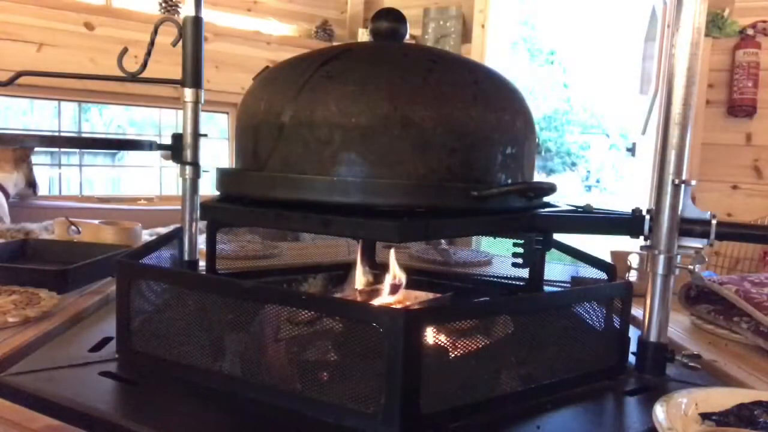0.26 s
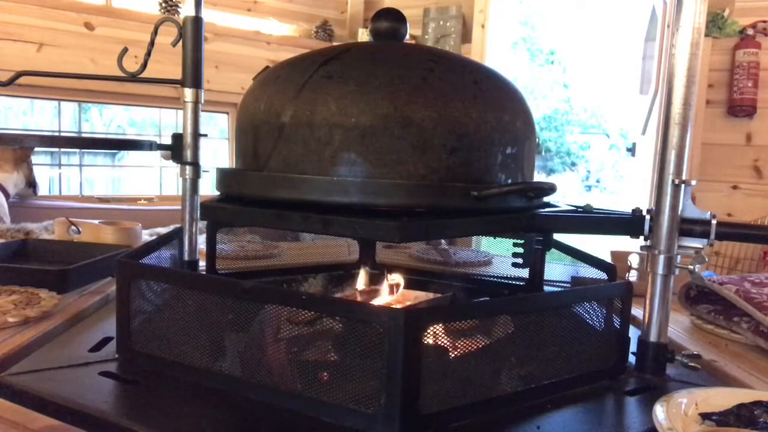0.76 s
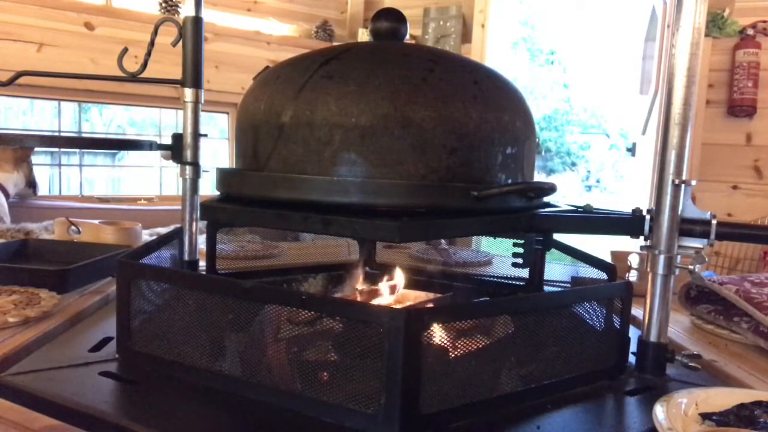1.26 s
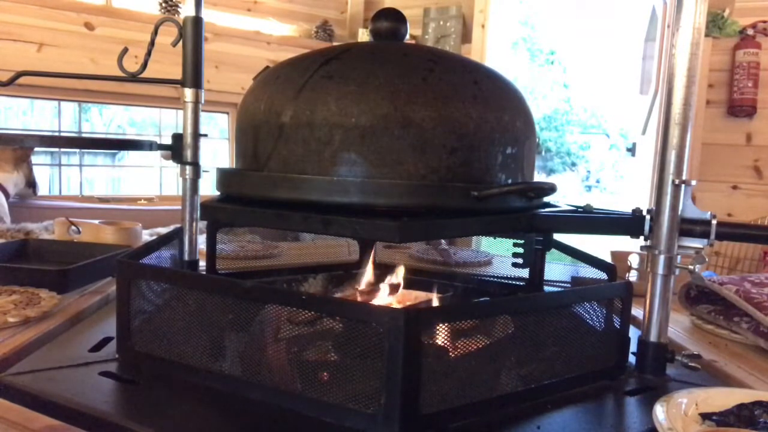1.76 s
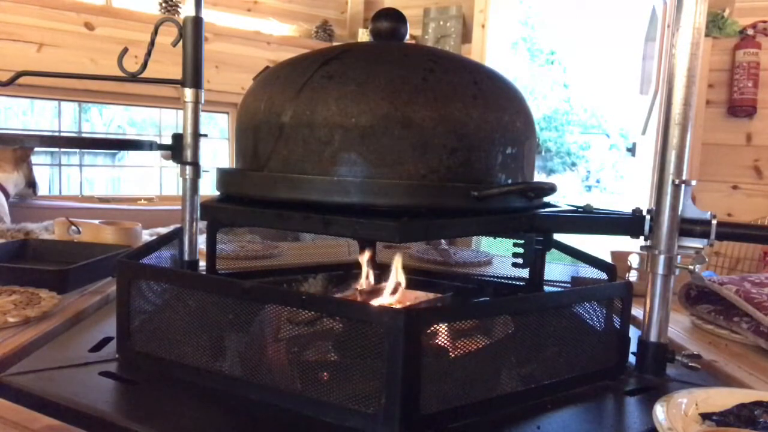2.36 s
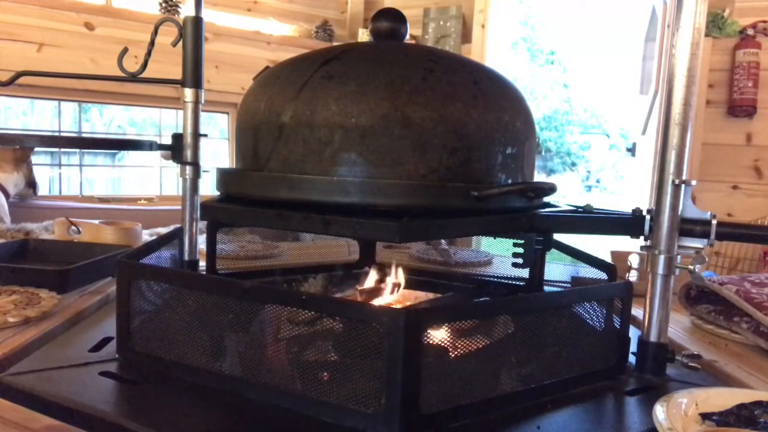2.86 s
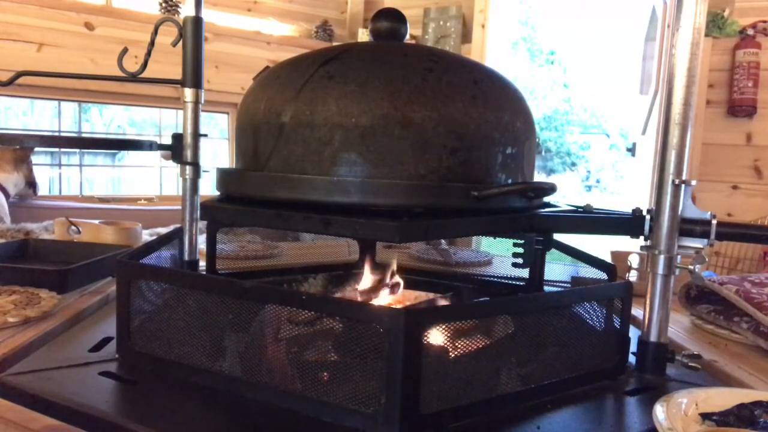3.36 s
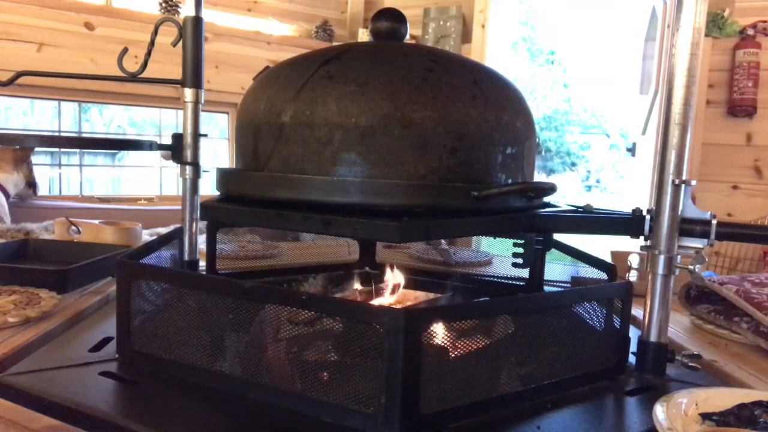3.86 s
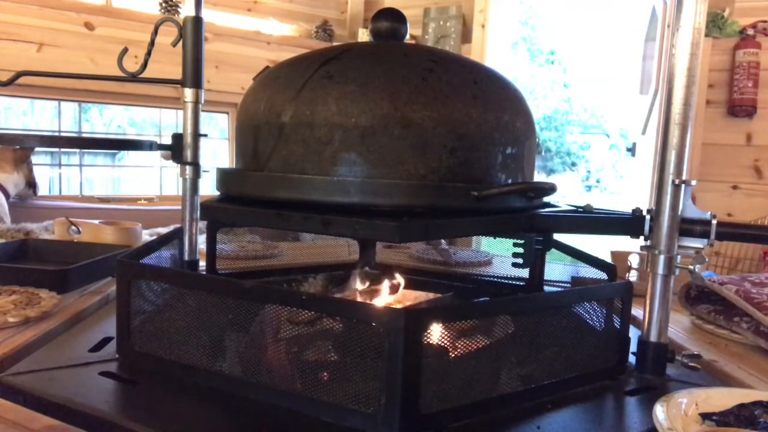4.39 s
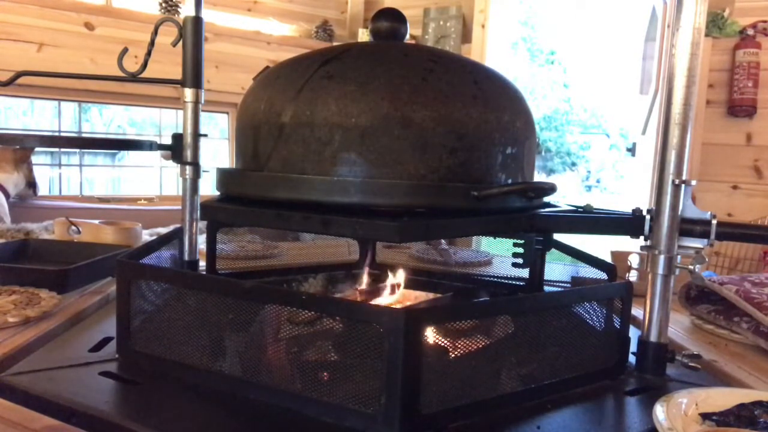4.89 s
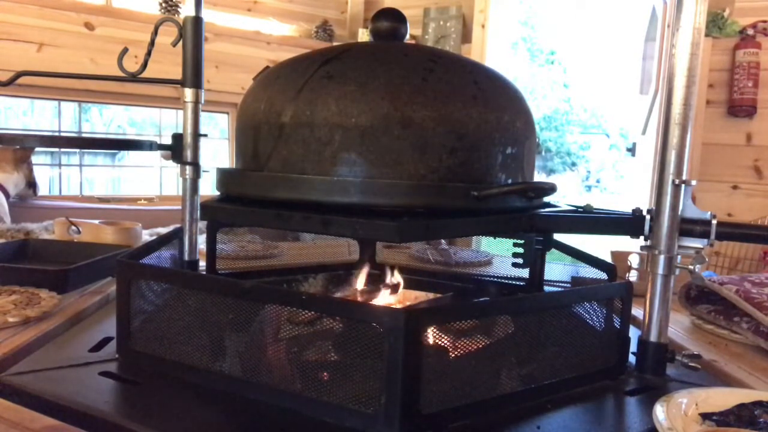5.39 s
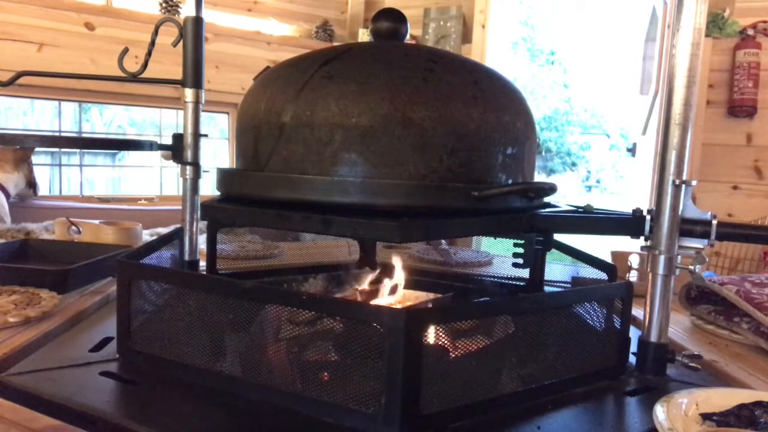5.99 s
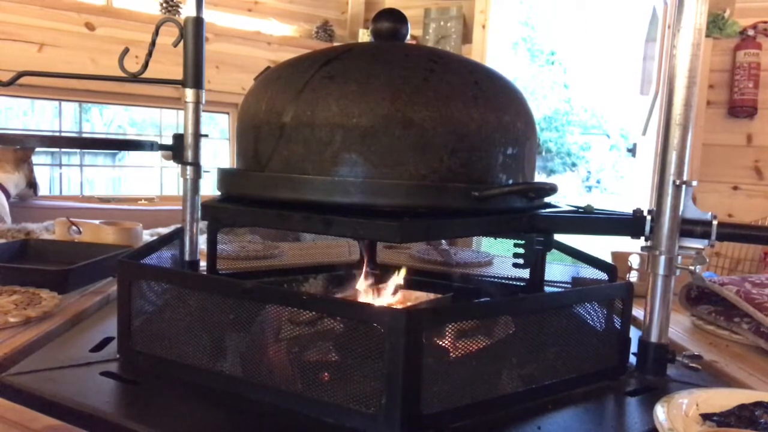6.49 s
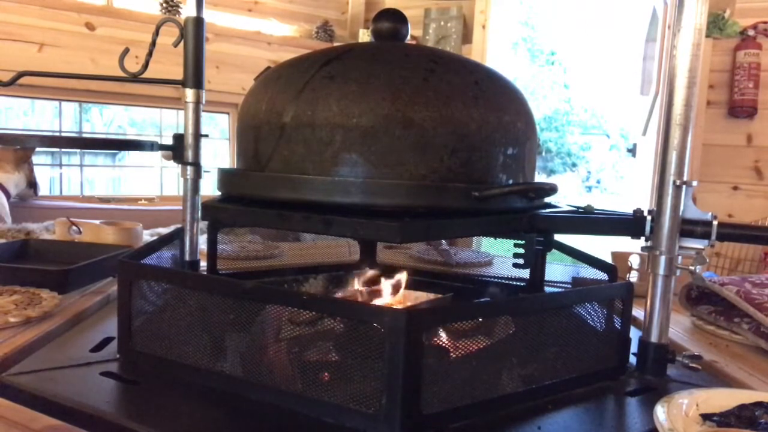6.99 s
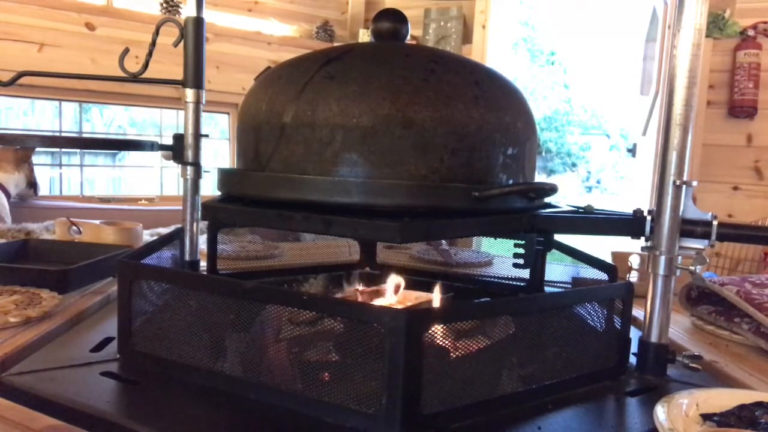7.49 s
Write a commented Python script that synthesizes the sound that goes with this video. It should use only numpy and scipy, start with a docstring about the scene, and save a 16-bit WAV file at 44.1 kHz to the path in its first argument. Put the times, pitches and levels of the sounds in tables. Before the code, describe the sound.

Meat sizzles and spits steadily under a domed iron lid over a softly fluttering wood fire, with pops and one dull wooden knock.

```python
"""A broad, even rush fills the first half second and stops with a soft click; behind it a wood fire flutters in a hut.
Meat sizzles under a domed iron lid: bubbling fat and fizz are filtered bursts and noise, spurts and pops are
decaying crowds of bubbles and pings, and escaping steam hisses and whistles as narrow sliding noise.
Embers snap as short noise, the floor thumps in a few low modes, and wood scuffs softly and knocks once.
A small bird chirps faintly outside in two rising voices; the wooden walls answer as a short noise tail."""
import sys
import numpy as np
from scipy import signal
from scipy.fft import rfft, irfft, next_fast_len
from scipy.io import wavfile
from scipy.ndimage import map_coordinates

SR = 44100
rng = np.random.default_rng(int(sys.argv[2]) if len(sys.argv) > 2 else 0)


def persist_wave(psi):
    """Save psi, clipped to +-1, as 16-bit WAV."""
    counts = np.round(np.clip(psi, -1, 1) * 32767).astype(np.int16)
    wavfile.write(sys.argv[1], SR, np.atleast_2d(counts).T)


N = 341583
TIME = np.arange(N) / SR  # seconds
RUSH_STOP_S = 0.5091  # when the opening rush stops

# How hard the fat works on the plate. Each row: time in seconds, boiling level in dB before its trim, fizz level in dB.
HEAT_CURVE = [(0.5, -61.5, -62.5), (0.56, -55, -67.5), (1.12, -54, -69), (1.57, -53.5, -60),
              (1.95, -52, -62.5), (2.29, -51.5, -65), (3.17, -49.5, -60), (3.6, -52.5, -64.5),
              (4.03, -51.5, -62.5), (4.38, -50.5, -65), (5.07, -51, -62), (5.55, -52.5, -64),
              (5.85, -54, -65.5), (6.5, -55, -63.5), (7.29, -54.5, -64), (7.75, -51.5, -62.5)]
# Colour of the frying heard through the gap of the lid. Each row: frequency in Hz, level in dB per Hz.
FAT_SPECTRUM = [(590, -35.5), (1000, -18), (1140, -24), (1310, -17), (1630, -10.5), (1790, -13), (2280, -2),
                (2520, -2.5), (3050, -1), (3650, -6), (4640, -13), (4830, -18), (6660, -20), (11000, -37.5),
                (14300, -104), (22000, -120)]
# Resonances of the air under the lid. Each row: frequency in Hz, width in Hz at half gain, relative level in dB.
LID_MODES = [(1325, 50, -9), (1490, 80, -12), (1640, 60, -5), (2300, 170, -1), (2780, 130, -3),
             (2960, 90, -2), (3160, 140, 0), (3490, 90, -6), (3830, 90, -12), (4220, 120, -9),
             (4570, 150, -4), (5340, 110, -11), (5730, 120, -13), (7940, 150, -18)]


def amp(db):
    """Decibels to gain."""
    return 10 ** (np.asarray(db) / 20)


def unit(x):
    """Scale to rms 1."""
    return x / np.sqrt(np.mean(x ** 2) + 1e-20)


def along(points, hz):
    """Read (Hz, value) points on a logarithmic frequency axis."""
    f, v = np.transpose(points)
    return np.interp(np.log(hz + 1), np.log(f + 1), v)


def curves(rows):
    """One value per sample for each column after the time."""
    s, *columns = np.transpose(rows)
    return [np.interp(TIME, s, column) for column in columns]


def wobble(rate):
    """A smooth random curve with rate knots a second."""
    knots = rng.standard_normal(int(N * rate / SR) + 4)
    return map_coordinates(knots, [TIME * rate])


def fade(t, t60):
    """Exponential decay by 60 dB in t60 seconds."""
    return np.exp(-np.log(1000) * t / max(t60, 1e-4))


def add(track, s, sound):
    """Mix a sound into the track at s seconds."""
    start = max(round(s * SR), 0)
    part = track[start:][:len(sound)]
    part += sound[:len(part)]


def coloured(x, gain):
    """Causal minimum-phase filter whose gain is a function of frequency."""
    m = 2 * next_fast_len(N // 2 + 8192)
    log_gain = np.log(np.maximum(gain(np.fft.rfftfreq(m, 1 / SR)), 1e-6))
    cepstrum = irfft(log_gain)
    # fold the second half onto the first: nothing sounds ahead of its cause
    cepstrum[1:m // 2] *= 2
    cepstrum[m // 2 + 1:] = 0
    return irfft(rfft(x, m) * np.exp(rfft(cepstrum)))[:N]


def noise(spectrum):
    """Noise of rms 1 with a given spectrum."""
    return unit(coloured(rng.standard_normal(N), lambda hz: amp(along(spectrum, hz))))


def narrow(hz, width_hz):
    """A fuzzy line of rms 1: slow noise carried on the pitch hz, one value per sample."""
    phase = 2 * np.pi * np.cumsum(hz) / SR
    knots = np.arange(len(hz)) * width_hz / SR
    a, b = (map_coordinates(rng.standard_normal(4096), [knots], mode="mirror") for _ in range(2))
    return unit(a * np.cos(phase) + b * np.sin(phase))


def hut(x, wet_db):
    """Direct sound plus the decaying answer of the wooden walls, scaled for unchanged power."""
    # Decay of the hut. Each row: frequency in Hz, time to fall 60 dB in seconds.
    wall_decay = [(200, 0.12), (2500, 0.65), (12000, 0.36)]
    hz, t, z = signal.stft(rng.standard_normal(SR // 2), SR, nperseg=256)
    decay = np.exp(-np.log(1000) * t / along(wall_decay, hz)[:, None])
    tail = signal.istft(z * decay, SR, nperseg=256)[1]
    late = np.pad(x, (SR // 300, 0))  # the walls answer after 1/300 s
    echo = signal.fftconvolve(late, tail / np.linalg.norm(tail))[:N]
    return (x + amp(wet_db) * echo) / np.hypot(1, amp(wet_db))


def close_echoes(x, count=14, span_s=0.009, bounce=0.087):
    """A few random, closely spaced reflections cut fine fixed ridges into the spectrum."""
    when, strength = rng.random(count), rng.standard_normal(count)
    echoes = np.bincount((when * span_s * SR).astype(int) + 1, bounce * strength)
    echoes[0] = 1  # direct sound
    return signal.fftconvolve(x, echoes / np.linalg.norm(echoes))[:N]


def patchy(x, depth_db, order=(5, 9)):
    """Many spots boil on their own, so each region of pitch swells and sinks by itself."""
    z = signal.stft(x, nperseg=256)[2]
    smoothing = np.outer(*map(np.hanning, order))  # over frequency, over time
    field = signal.fftconvolve(rng.standard_normal(z.shape), smoothing, "same")
    return signal.istft(z * amp(depth_db * unit(field)), nperseg=256)[1][:N]


def bubbles(rate, spread_db, cycles, low_hz, high_hz, count=30000, size=128):
    """Tiny bursting bubbles at random times: damped pings of uneven size and pitch."""
    when, pitch, rank, alive = rng.random((count, 4)).T[:, :, None]
    hz = low_hz * (high_hz / low_hz) ** pitch
    t = np.arange(size) / SR
    happens = alive < rate * N / SR / count
    strength = amp(-spread_db * np.log(rank + 0.01)) * happens * np.sqrt(hz / low_hz)
    pings = strength * np.sin(2 * np.pi * hz * t) * np.exp(-hz * t / cycles)
    places = (when * N).astype(int) + np.arange(size)
    return unit(np.bincount(places.ravel(), pings.ravel())[:N])


def small_events(rate, level_db, spread_db=2, count=80, calm_db=-52):
    """Random events, more frequent and louder with the heat: rows (s, dB, a chance value 0-1)."""
    # rate (per second) and level_db hold where the boiling curve stands at calm_db, an ordinary simmer
    when, luck, size, chance = rng.random((count, 4)).T
    s = when * N / SR
    times, heat_db, _ = np.transpose(HEAT_CURVE)
    over_db = np.interp(s, times, heat_db) - calm_db
    happens = luck < rate * amp(over_db) * N / SR / count
    event_db = level_db + over_db + spread_db * (2 * size - 1)
    return np.column_stack([s, event_db, chance])[happens]


def puffs(rows, width, glide):
    """Short swells of narrow noise, each sliding a little in pitch."""
    out = np.zeros(N)
    for s, db, hz, length in rows:
        u = np.linspace(-1, 1, int(length * SR))
        pitch = hz * (1 + glide * rng.uniform(-0.948, 1) * u)
        swell = np.cos(np.pi / 2 * u)
        add(out, s - length / 2, amp(db) * swell * narrow(pitch, width * hz))
    return out


def under_lid(x, ring_db):
    """Frying heard through the gap of the lid, whose cavity lifts a few narrow bands."""
    def gain(hz):
        ring = sum(amp(db) / (1 + (2 * (hz - fc) / width) ** 2) for fc, width, db in LID_MODES)
        return amp(along(FAT_SPECTRUM, hz)) + amp(ring_db) * ring
    return unit(coloured(x, gain))


def rush(click_db=-32.0, click_hz=2400, fall_s=0.00028, click_t60=0.022):
    """A broad, even rush stops dead with a soft click whose pitch drops into the bass."""
    # Colour of the rush. Each row: frequency in Hz, level in dB per Hz.
    rush_spectrum = [(60, -13), (150, -6), (280, 0.5), (400, -1), (700, 2), (1300, 4), (2000, 3.5),
                     (2800, 7), (4000, -2.5), (9000, -21), (15000, -62)]
    out = amp(-51.5) * noise(rush_spectrum) * (TIME < RUSH_STOP_S)
    t = TIME[:SR // 20]
    phase = 2 * np.pi * np.cumsum(click_hz / (1 + t / fall_s)) / SR
    add(out, RUSH_STOP_S, amp(click_db) * np.sin(phase) * fade(t, click_t60))
    return out


def air(lower_hz=602, upper_hz=702, air_db=-66.5, hush_depth_db=-3, recovery_s=0.74):
    """Still hut air as soft noise with two faint wavering tones, all hushed just after the rush."""
    # Two hollow tones take turns. Each row: time in seconds, lower tone in dB, upper tone in dB, before a 1 dB cut.
    hollow_levels = [(.7, -80, -86), (.9, -71, -85), (1.42, -68, -73), (1.55, -77, -71.5), (3.5, -92, -74),
                     (5.6, -86, -71.5), (6.6, -77, -77), (6.8, -69, -82), (7.75, -67, -71)]
    # Colour of the still air. Each row: frequency in Hz, level in dB per Hz.
    air_spectrum = [(30, -5.5), (70, -1), (150, -2), (280, 1.5), (380, 0), (520, -0.5), (640, -1),
                    (800, -1), (1100, -3), (1600, -9.5), (4000, -40)]
    lower_db, upper_db = curves(hollow_levels)
    since = (TIME - RUSH_STOP_S) / recovery_s
    hush_db = hush_depth_db * (since > 0) * np.clip(1 - since ** 2, 0, 1)

    def wavering(hz, db):
        return amp(db + 2.5 * wobble(20)) * narrow(hz + 14 * wobble(8), width_hz=90)
    tones = wavering(lower_hz, lower_db) + wavering(upper_hz, upper_db)
    still = amp(air_db + 0.6 * wobble(3.805)) * noise(air_spectrum)
    return amp(hush_db) * (still + amp(-1) * tones)


def fire(spray_over_crack=14):
    """Flames flutter as low noise under the plate; embers snap with a sharp crack, then a short spray."""
    # Flutter of the flames. Each row: time in seconds, level in dB.
    flame_levels = [(0.0, -71), (1.1, -67), (1.8, -72), (3.3, -73.5), (4.85, -74), (5.6, -66), (7.0, -64),
                    (7.75, -67.5)]
    # Ember snaps. Each row: start in seconds, level in dB before a 3 dB lift, time for the crack to fall 60 dB in seconds.
    ember_snaps = [(1.6535, -60, .004), (1.767, -55, .008), (3.053, -56, .004), (3.2099, -45, 0.012),
                   (6.1288, -41.5, 0.0019), (7.72, -46, .003)]
    # Colours of flames and embers. Each row: frequency in Hz, level in dB per Hz.
    flame_spectrum = [(20, -37), (38, -22), (55, -4), (70, 1.5), (102, -7.5), (131, -7), (211, -18),
                      (300, -15), (390, -27), (660, -120)]
    ember_spectrum = [(500, -44), (3000, 0), (8000, 1), (15000, -17)]
    flame_db, = curves(flame_levels)
    snaps, t = np.zeros(N), TIME[:SR // 5]
    for s, db, crack_s in ember_snaps:
        shape = fade(t, crack_s) + amp(-15.5) * fade(t, spray_over_crack * crack_s)
        add(snaps, s, amp(db + 3.0) * shape * (1 - fade(t, 0.00056)))
    flutter = amp(flame_db + 1.2 * wobble(6)) * noise(flame_spectrum)
    return flutter + hut(snaps * noise(ember_spectrum), wet_db=-3)


def simmer():
    """A quiet, even simmer sounds the three lowest resonances of the lid."""
    # Low simmer under the lid. Each row: time in seconds, level in dB.
    simmer_levels = [(1.2, -78), (2.2, -71.5), (5.0, -69.5), (6.8, -67.5), (7.75, -85)]
    level_db, = curves(simmer_levels)
    bands = sum(amp(db) * narrow(np.full(N, hz), width_hz=2 * width) for hz, width, db in LID_MODES[:3])
    return amp(level_db + 3.7 * wobble(14)) * unit(bands)


def sizzle(boil_trim_db=-0.29):
    """Fat boils in clumps of bubbles; a finer fizz and steam lie on top, a low simmer beneath."""
    # High hiss of the steam. Each row: time in seconds, level in dB.
    steam_levels = [(0.5, -70.5), (1.3, -69.5), (1.55, -71), (3.05, -71), (3.6, -72.5), (5.55, -71),
                    (6.0, -71.5), (6.7, -71.5), (6.8, -69), (7.75, -69.5)]
    # Colours of fizz and steam. Each row: frequency in Hz, level in dB per Hz.
    fizz_spectrum = [(2240, -20), (3800, -1.5), (4700, -7), (5400, -3.5), (6630, -9.5), (8170, -24.5),
                     (9670, -28), (11000, -31), (14300, -63), (22000, -120)]
    steam_spectrum = [(2000, -21), (6000, 7.5), (9000, 3.5), (10000, -0.5), (10400, -6), (10900, -1),
                      (11400, 0), (12200, -3), (15500, -6.5)]
    heat_db, fizz_db = curves(HEAT_CURVE)
    steam_db, = curves(steam_levels)

    coarse = bubbles(rate=1800, spread_db=3.0, cycles=2.2, low_hz=1202, high_hz=5200, size=200)
    coarse = unit(coarse * amp(1.4 * wobble(70)))
    boil = under_lid(coarse + amp(-1) * rng.standard_normal(N), ring_db=-8)
    boil = unit(patchy(boil, depth_db=1.1))
    boil = boil * amp(heat_db + boil_trim_db + 1.0 * wobble(35))

    fine = bubbles(rate=1400, spread_db=3.4, cycles=2.4, low_hz=4170, high_hz=11400)
    fine = unit(fine * amp(2.5 * wobble(45)))
    fizz = coloured(fine + amp(1.0) * rng.standard_normal(N), lambda hz: amp(along(fizz_spectrum, hz)))
    # the fizz bounces a few times inside the lid
    fizz = unit(patchy(close_echoes(fizz, bounce=0.1), depth_db=1.3))
    fizz = fizz * amp(fizz_db + 0.27 * wobble(6.3))

    steam = unit(patchy(noise(steam_spectrum), depth_db=2.6))
    steam = steam * amp(steam_db + 0.65 * wobble(8))
    return hut(boil, wet_db=-5.0) + hut(fizz, wet_db=-12) + steam + simmer()


def spurts(sputter_hz=3000, spurt_t60=0.12):
    """Each drop of fat flashes into a crowd of bubbles and a sliding sputter of steam that die away."""
    # Big drops flaring up on the plate. Each row: start in seconds, level in dB before an 11 dB cut.
    big_drops = [(0.593, -36.5), (0.685, -39.5), (0.742, -37.5), (1.251, -35.5), (1.638, -35), (1.72, -32),
                 (1.7654, -40), (1.848, -32), (1.9875, -33), (2.06, -36.5), (2.23, -35), (2.359, -36),
                 (2.57, -42), (2.9947, -33), (3.044, -41), (4.028, -40), (4.2266, -32.5), (4.2836, -35.5),
                 (4.485, -37), (4.606, -40), (4.704, -36), (5.1632, -32), (5.5928, -29.5), (6.798, -38.5),
                 (7.704, -35.5)]
    flare, t = np.zeros(N), TIME[:SR // 2]
    small = [(s, db) for s, db, _ in small_events(rate=8, level_db=-49)]
    for s, db in [*big_drops, *small]:
        add(flare, s, amp(db - 11.0) * fade(t, spurt_t60) * (1 - fade(t, 0.0078)))
    crowd = bubbles(rate=3800, spread_db=2.5, cycles=3.1, low_hz=1840, high_hz=10000)
    crowd = under_lid(crowd, ring_db=-26)
    sputter = narrow(sputter_hz * np.exp(0.07 * wobble(35)), width_hz=530)
    return hut(flare * (crowd + amp(-4.0) * sputter), wet_db=-10.5)


def squeaks(low_hz=1350, high_hz=6000, typical_s=0.028):
    """Vapour squeezes through pinholes in the fat: brief, thin whistles that slide up or down."""
    rows = []
    for s, db, u in small_events(rate=34, level_db=-52, count=500):
        hz = low_hz * (high_hz / low_hz) ** u
        length = typical_s * (0.5 + rng.random())
        rows.append((s, db + along(FAT_SPECTRUM, hz), hz, length))
    return hut(puffs(rows, width=0.06, glide=0.09), wet_db=-12)


def pops(low_hz=2300, high_hz=4400, small_ring_s=0.0067, crack_db=0.5):
    """A blister bursts: a sharp crack, then a brief ping and a weaker spray, both muffled by the lid."""
    # Single blisters. Each row: start in seconds, level in dB before each part's own offset,
    # ping pitch in Hz, time for the ping to fall 60 dB in seconds.
    blisters = [(0.8829, -21.5, 2700, 0.0036), (0.925, -29, 2870, .0067), (1.4003, -24, 3000, .003),
                (1.5937, -22.5, 2340, .007), (1.638, -25, 2620, .0055), (1.7015, -29, 2300, .012),
                (1.7663, -25, 2360, .0033), (1.9875, -21, 1690, 0.0096), (2.2345, -24.5, 3110, 0.0098),
                (2.8645, -22.5, 3130, 0.0074), (3.1592, -28, 2830, .007), (3.2021, -29, 2770, 0.0045),
                (3.2668, -28, 2900, 0.01), (3.823, -22.5, 2420, 0.0081), (3.9537, -25, 2550, 0.0042),
                (4.1107, -23, 2000, 0.0045), (4.3045, -25, 3220, .0093), (4.408, -31, 3140, .005),
                (4.433, -28.5, 2990, 0.012), (4.4944, -23, 2580, 0.0071), (4.566, -21.5, 2390, .004),
                (4.911, -29, 2263, 0.0079), (5.1242, -25, 2760, 0.0074), (5.5134, -24, 2220, 0.0059),
                (5.6014, -34, 2760, 0.0031), (5.924, -34, 2350, 0.015), (6.1292, -24.5, 2300, 0.0061),
                (6.2062, -21, 2830, 0.008), (6.803, -28, 3980, .004), (6.9483, -25.5, 2460, 0.0068),
                (6.9806, -25, 3000, .002), (7.1793, -27, 3770, 0.0033), (7.5558, -24.5, 2540, 0.007),
                (7.6267, -33, 3000, .003), (7.72, -22, 2800, 0.0016)]
    # Colour of the crack. Each row: frequency in Hz, level in dB.
    crack_spectrum = [(700, -25), (2200, -1), (4200, -5), (6000, -10), (9000, -24), (15000, -36)]
    cracks, pings, spray, t = np.zeros(N), np.zeros(N), np.zeros(N), TIME[:SR // 10]
    small = [(s, db, low_hz + u * (high_hz - low_hz), small_ring_s)
             for s, db, u in small_events(rate=100, level_db=-40.5, count=1200)]
    for s, db, hz, ring_s in [*blisters, *small]:
        add(cracks, s, amp([db + crack_db]))  # a single sample
        ping = np.sin(2 * np.pi * hz * t) * fade(t, ring_s) * (1 - fade(t, 0.0015))
        add(pings, s, amp(db - 2.0) * ping)
        add(spray, s, amp(db - 14.5) * fade(t, 0.042))
    burst = pings + spray * rng.standard_normal(N)
    burst = coloured(burst, lambda hz: amp(along(FAT_SPECTRUM, hz)))
    cracks = coloured(cracks, lambda hz: amp(along(crack_spectrum, hz)))
    return hut(burst + cracks, wet_db=-7)


def thumps(rise_s=0.09):
    """Soft blows swell the low modes of the wooden floor."""
    # Blows. Each row: start in seconds, level in dB before a 4.5 dB lift.
    blows = [(0.76, -60), (0.954, -57), (1.309, -55), (1.355, -51), (1.474, -57), (5.3, -58),
             (5.515, -46.5), (5.671, -54.5), (5.783, -53), (6.015, -49.5), (6.117, -47), (6.751, -53),
             (6.958, -37.5)]
    # Floor modes. Each row: frequency in Hz, mean relative level in dB, time to fall 60 dB in seconds.
    floor_modes = [(76.5, 2, 0.25), (128, -2.5, 0.22), (153, -0.5, 0.067), (268, -21, 0.065)]
    out, t = np.zeros(N), TIME[:SR // 2]
    for s, db in blows:
        ring = np.zeros(len(t))
        for hz, level, t60 in floor_modes:
            gain = amp(level + rng.normal(0, 0.39))
            ring += gain * fade(t, t60) * np.sin(2 * np.pi * (hz * t + rng.random()))
        add(out, s, amp(db + 4.5) * ring * (1 - fade(t, rise_s)) ** 2)
    return out


def jets(ragged_db=3.5):
    """Ragged swells of noise: steam spits through small openings in the skin, with sputters and ticks."""
    # Hisses, low sputters and very short bright ticks.
    # Each row: middle in seconds, level in dB, pitch in Hz, length in seconds.
    hisses_and_ticks = [(0.795, -71, 9600, .05), (0.94, -70, 8500, 0.052), (1.066, -69, 9300, 0.043),
                        (1.16, -61.5, 1396, 0.058), (1.29, -73, 9500, .06), (1.4, -61.5, 5240, 0.24),
                        (1.555, -59, 4540, 0.065), (1.73, -57.5, 1453, 0.07), (1.766, -54, 1890, 0.093),
                        (1.995, -52, 1574, 0.054), (2.03, -74, 9100, 0.14), (2.215, -75, 11800, 0.09),
                        (2.342, -57.5, 4720, 0.14), (2.81, -64, 7050, 0.17), (2.867, -41, 4260, 0.007),
                        (3.956, -47, 5050, 0.0079), (4.0, -66, 8000, 0.055), (4.477, -53.5, 5060, 0.018),
                        (6.2005, -57, 8900, 0.003), (6.215, -70, 8700, 0.035), (6.345, -61, 6020, 0.059),
                        (6.649, -53.5, 5670, 0.013), (7.258, -51, 4150, 0.016), (7.639, -52, 4500, 0.056)]
    spitting = unit(amp(ragged_db * wobble(220) + 2 * wobble(60)))
    return hut(puffs(hisses_and_ticks, width=0.3, glide=0.0513) * spitting, wet_db=-12)


def scuffs():
    """Dull, soft scuffs, and one low tick under a bursting blister, as swells of broad noise."""
    # Scuffs and the tick. Each row: middle in seconds, level in dB, pitch in Hz, length in seconds.
    scuffs_and_tick = [(1.2, -65.5, 527, 0.14), (1.37, -71, 202.4, 0.14), (1.75, -66, 333, 0.085),
                       (1.85, -62.5, 294, 0.045), (1.95, -63.5, 285, 0.071), (3.826, -50.5, 940, 0.0056),
                       (5.81, -65, 259, 0.12), (6.142, -57, 266, 0.053), (6.672, -59, 293, 0.035),
                       (6.79, -66.5, 262, 0.064)]
    return puffs(scuffs_and_tick, width=0.91, glide=0.12)


def bird(sweep_hz=2000, rise_s=0.00395, length_s=0.019, lower_voice=0.9):
    """Thin two-voiced chirps sweep up and level off, blurred by echo."""
    # Chirps. Each row: start in seconds, level in dB before a 4 dB cut, top pitch of the upper voice in Hz.
    chirps = [(3.832, -60, 7400), (3.894, -59, 7400), (4.071, -59, 7430), (4.135, -60, 7500),
              (4.288, -58, 7400), (4.243, -58, 6630), (7.077, -60, 8100), (7.266, -56.5, 8060),
              (7.328, -59.5, 8100), (7.49, -64, 8050), (7.553, -68, 8050), (7.685, -64, 7400)]
    out = np.zeros(N)
    t = TIME[:int(length_s * SR)]
    for s, db, top_hz in chirps:
        hz = top_hz - sweep_hz * np.exp(-t / rise_s)
        voices = narrow(hz, width_hz=160) + amp(-1.5) * narrow(lower_voice * hz, width_hz=170)
        add(out, s, amp(db - 4.0) * voices * signal.windows.tukey(len(t), 0.4))
    return hut(close_echoes(out, span_s=0.03, bounce=0.19), wet_db=-27)


def knock(ring_db=-22, rattle_db=-20, rattle_hz=500, rattle_t60=0.07):
    """A dull, bouncing knock: each contact is a few low cycles, then the wood rings and rattles briefly."""
    # Contacts of the hollow knock. Each row: start in seconds, level in dB, pitch in Hz, time to the peak in seconds.
    contacts = [(6.4044, -29.5, 630, 0.0022), (6.4137, -23.5, 560, 0.0017), (6.4246, -34, 500, 0.0036),
                (6.446, -48, 497, .0026), (6.665, -52, 475, 0.0028)]
    # Modes of the knocked wood. Each row: frequency in Hz, relative level in dB, time to fall 60 dB in seconds.
    wood_modes = [(226, 0, 0.29), (311, 9, 0.081), (471, 7, 0.17), (550, 15.5, 0.057), (760, 10, 0.069),
                  (770, -5, 0.069)]
    out, t = np.zeros(N), TIME[:SR // 4]
    ring = sum(amp(db) * fade(t, t60) * np.sin(2 * np.pi * hz * t) for hz, db, t60 in wood_modes)
    for s, db, hz, contact_s in contacts:
        push = (t / contact_s) ** 2 * np.exp(2 - 2 * t / contact_s)
        rattle = narrow(np.full(len(t), rattle_hz), width_hz=530) * fade(t, rattle_t60)
        tail = (amp(ring_db) * ring + amp(rattle_db) * rattle) * (1 - fade(t, 0.0092))
        add(out, s, amp(db) * (push * np.sin(2 * np.pi * hz * t) + tail))
    return hut(out, wet_db=-29)


def scene():
    """Everything around the grill, heard from one place in the hut by one microphone."""
    grill = fire() + sizzle() + spurts() + squeaks() + pops() + jets()
    surroundings = rush() + air() + thumps() + scuffs() + bird() + knock()
    return (grill + surroundings)[None]


def record(dry, top_hz=15750):
    """The microphone's signal keeps nothing at or above its band limit."""
    m = next_fast_len(N + SR // 2)
    passed = np.fft.rfftfreq(m, 1 / SR) < top_hz
    return irfft(rfft(dry, m) * passed, m)[..., :N]


dry = scene()
out = record(dry)
persist_wave(out)
```